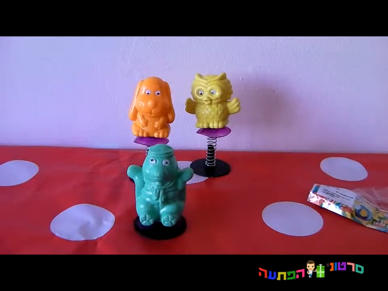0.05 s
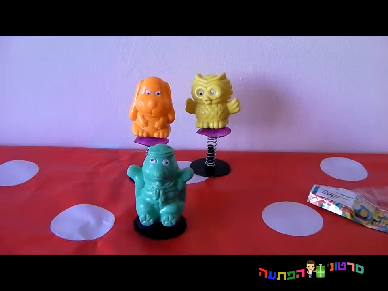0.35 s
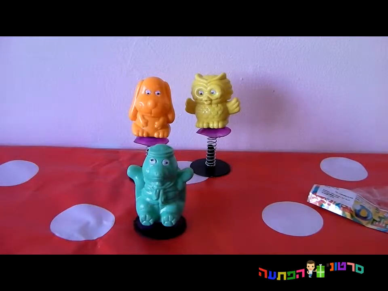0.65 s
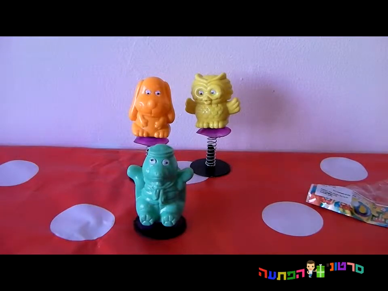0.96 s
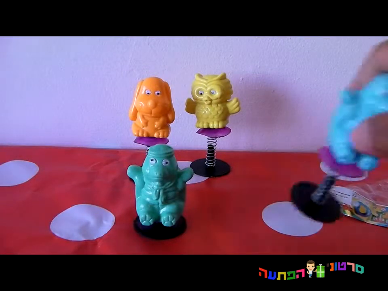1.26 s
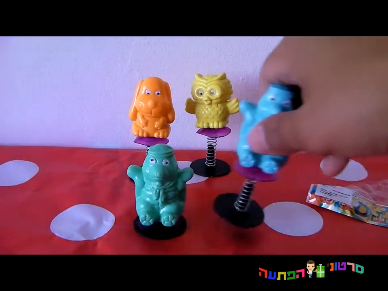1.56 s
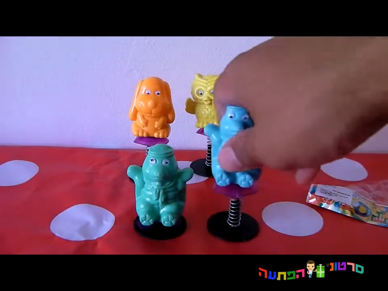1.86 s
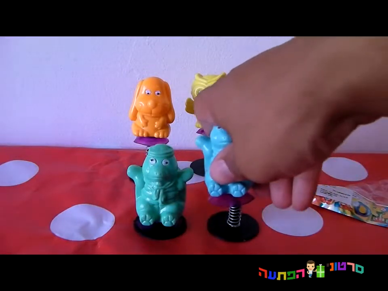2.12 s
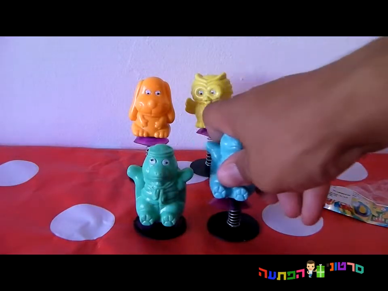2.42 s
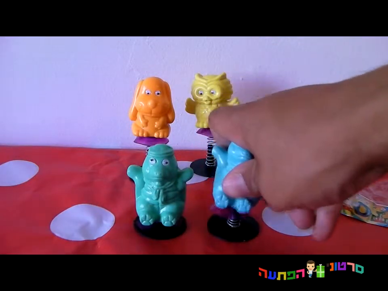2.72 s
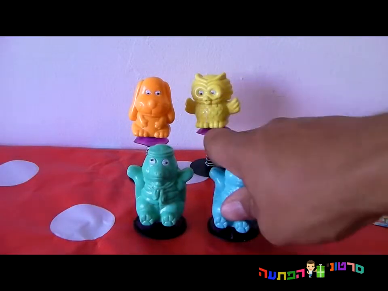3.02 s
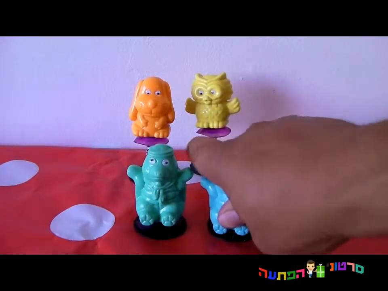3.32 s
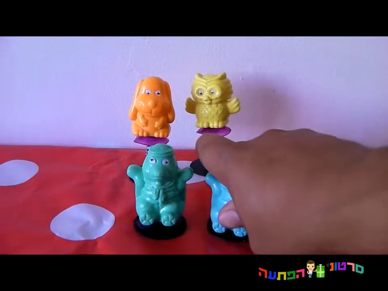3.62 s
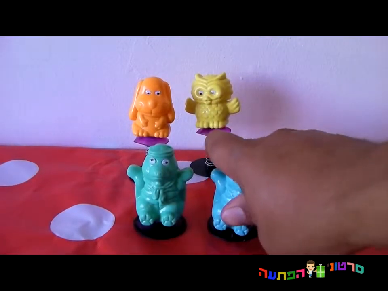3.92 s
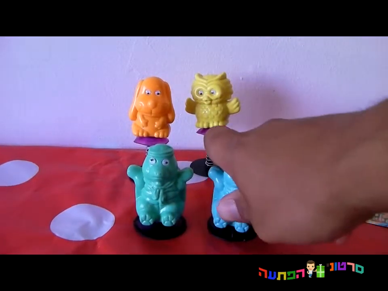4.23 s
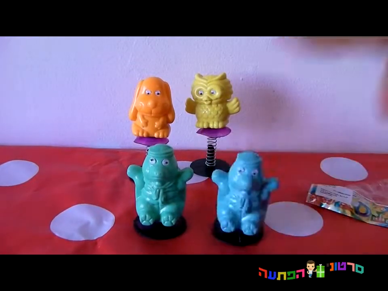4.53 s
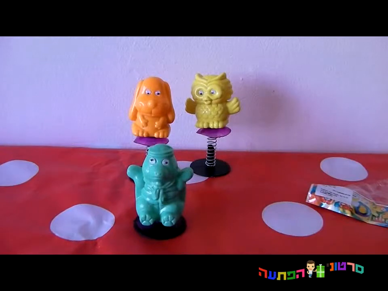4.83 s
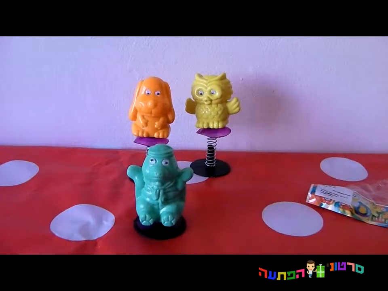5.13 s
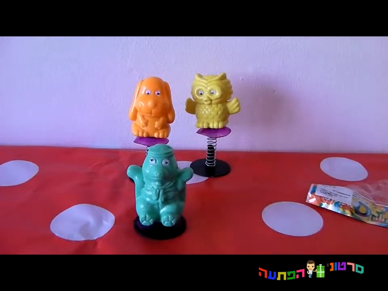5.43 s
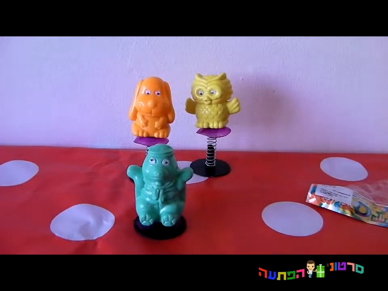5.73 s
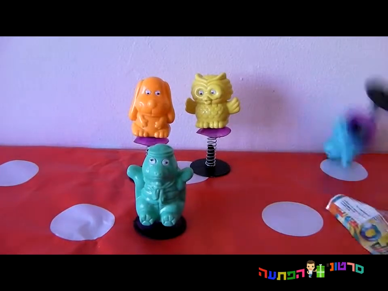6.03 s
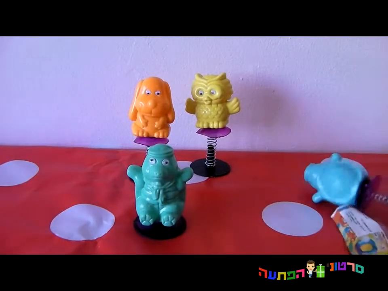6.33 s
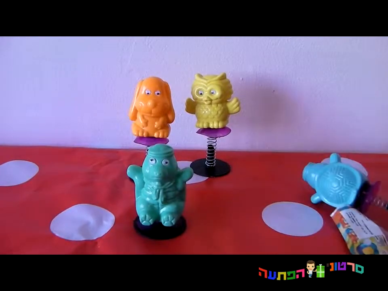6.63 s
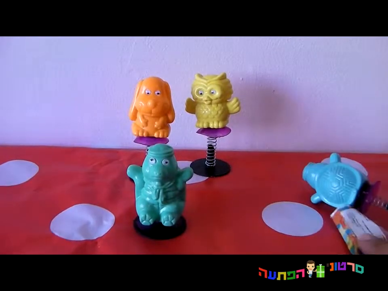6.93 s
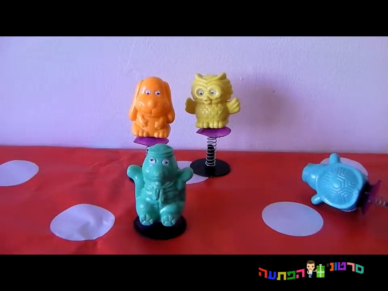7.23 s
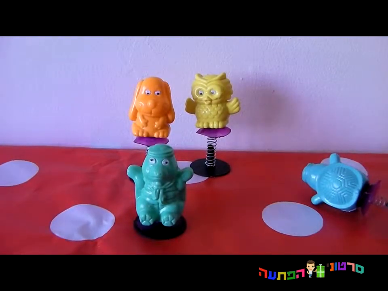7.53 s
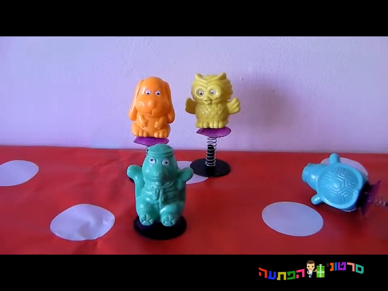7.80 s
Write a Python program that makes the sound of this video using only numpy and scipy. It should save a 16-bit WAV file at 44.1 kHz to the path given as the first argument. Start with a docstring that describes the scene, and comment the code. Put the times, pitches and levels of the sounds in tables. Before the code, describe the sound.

Hollow plastic jumping toys click, creak and snap loose, one landing with a loud clatter, before a wrapper slips away.

```python
"""Spring-loaded plastic toy animals with suction cups clack on a cloth-covered table.
One lands; a hand sets another down and presses it onto its cup; cups pop loose, and a toy leaps,
crashes and tumbles. Each blow rings a hollow plastic body and thumps the table. The toy nudges a
plastic packet, which slides off the edge. The place is a small, hard room with a faint hum.
Heard in stereo from close by, the toys a little to the right; the loudest blows overload the mics."""
import sys
import numpy as np
from scipy import signal
from scipy.fft import rfft, irfft, next_fast_len
from scipy.io import wavfile
from scipy.ndimage import map_coordinates

SR = 44100
rng = np.random.default_rng(int(sys.argv[2]) if len(sys.argv) > 2 else 0)


def store_pcm(level_fs):
    """Save levels as 16-bit WAV."""
    pcm = np.round(np.clip(level_fs, -1, 1) * 32767).astype(np.int16)
    wavfile.write(sys.argv[1], SR, np.atleast_2d(pcm).T)


N = 346626
TIME = np.arange(N) / SR
AGE = np.arange(SR * 3 // 4) / SR  # seconds since a contact
TOP_HZ = 15850

# A toy falls or tumbles. Each row: start in seconds, strength in dB, the clack's upper edge in Hz,
# hollow ring in dB, table thump in dB. Levels in all tables are relative.
LANDINGS = [(-.03, 6, 2700, 3.5, -15.5), (0.215, -4.5, 1664, -4, -20.5), (6.035, 9, 2700, -3.5, -13.5),
            (6.079, -19, 1500, -10, -19.5), (6.127, -17, 2840, -28, -28), (6.215, -22, 1773, -14.5, -23.5),
            (6.264, -8.5, 2883, -10.5, -22.5)]
# A toy is forced onto its cup. Each row: start in seconds, strength in dB, upper edge in Hz,
# snap in dB, push on the table in dB, wait until it settles in seconds, settling clack in dB.
PRESSES = [(2.3923, -17.5, 3130, -9, -36, 0.0365, -18.5), (2.88, -17, 4000, -17.5, -19.5, 0.028, -40),
           (3.0377, -9.5, 3270, -2, -14, 0.028, -18.5)]
# A cup lets go. Each row: start in seconds, strength in dB, upper edge in Hz, then snap,
# hollow ring, table thump and coil ring, all in dB.
RELEASES = [(4.799, -5.5, 3860, -6, -17, -18, -16), (5.703, -4, 3780, 8, -3, -22.5, -16.5)]
# Blows on the rim of a base. Each row: start in seconds, ring in dB.
RIM_BLOWS = [(2.393, -20), (3.038, -18), (6.036, 1), (6.264, -21)]
# The flying toy knocks on its spring. Each row: start in seconds, click in dB, hollow ring in dB.
RATTLES = [(5.733, -10, -26), (5.747, -9.5, -23), (5.795, -18, -29)]
# Jolts to the coils. Each row: start in seconds, level in dB.
JOLTS = [(3.039, -16.5), (4.809, -17.5), (5.709, -9), (6.042, -11.5), (6.265, -19)]
# Clicks of coils, cup rims, plastic and packet. Each row: start in seconds, level in dB, centre in Hz.
TICKS = [(0.293, -11.5, 7020), (1.9092, -26, 4930), (1.9234, -30, 4180), (2.8518, -23.5, 3500),
         (3.327, -28.5, 2500), (3.3547, -15.5, 6000), (3.9233, -20.5, 4420), (4.247, -29, 3500),
         (4.3878, -23, 1900), (4.56, -26, 6910), (4.593, -15.5, 5830), (6.078, -8.5, 10000),
         (6.163, -2, 7500), (7.501, -12.5, 10000)]
# The spring creaks, held down or in flight. Each row: start and end in seconds, mean level in dB,
# centre in Hz.
CREAKS = [(3.32, 3.9, -35, 8000), (4.3, 4.7, -32, 7000), (5.8, 6.0, -28, 11000)]
# Coils chatter or a cup's rim creeps. Each row: start and end in seconds, slips per second,
# level in dB, centre in Hz.
SLIP_RUNS = [(0.886, 1.005, 44, -31, 4050), (2.902, 2.969, 103, -33, 11000),
             (3.334, 3.427, 62, -40.5, 6650), (4.588, 4.677, 40, -35, 8500),
             (4.805, 4.836, 240, -7.5, 11900)]
# Finger strokes. Each row: start and length in seconds, rubbing in dB, table rumble in dB.
FINGER_STROKES = [(0.805, 0.19, -42, -47), (1.103, 0.54, -47, -66), (1.939, 0.2, -49, -81),
                  (2.385, 0.42, -45, -53), (3.218, 0.25, -42, -44), (3.92, 0.1, -41, -52),
                  (4.214, 0.14, -46, -49.5), (4.41, 0.26, -47.5, -53), (5.083, 0.02, -40.5, -41.5)]
# Soft bumps on the table. Each row: start in seconds, level in dB.
BUMPS = [(0.754, -43), (3.72, -40.5), (3.861, -40), (4.326, -41), (4.569, -27), (6.516, -37), (6.719, -48),
         (6.946, -39.5)]
# The packet slides in fits and starts. Each row: start and length in seconds, level in dB.
SLIDES = [(6.03, 0.57, -45.5), (6.683, 0.1, -38.5), (6.825, 0.048, -41.5), (7.019, 0.43, -39),
          (7.185, 0.089, -30), (7.31, 0.21, -38.5), (7.613, 0.52, -40)]
# Snaps of the packet's film. Each row: start in seconds, level in dB.
CRINKLES = [(7.03, -31), (7.122, -26.5), (7.132, -16.5), (7.139, -19.5), (7.175, -22), (7.201, -20.5),
            (7.228, -17.5), (7.248, -17), (7.257, -22), (7.297, -20.5)]

# Modes of a toy's shell (free and held), hollow body, base and coils, and of the table.
# Each row: frequency in Hz, level in dB, time to fall 60 dB in seconds.
SHELL_MODES = [(988, -13, 0.14), (1121, -11, 0.22), (1330, -14, 0.18), (1538, -10, 0.15), (1859, -14, 0.16),
               (2115, -14, 0.13), (2352, -12, 0.14), (3150, 6, 0.012)]
HELD_SHELL_MODES = [(780, 0, 0.018), (1560, -8, 0.025), (2560, 3, 0.018), (3800, 2, 0.012)]
HOLLOW_MODES = [(416, -13, 0.24), (428, 5, 0.05), (448, -13, 0.2), (476, 1, 0.06), (591, -5, 0.07)]
BASE_MODES = [(735, 0, 0.12), (1150, -3, 0.03)]
COIL_MODES = [(2700, 9, 0.012), (3370, -10, 0.2), (3500, 5, 0.014), (4437, -15, 0.22)]
TABLE_MODES = [(52, -12.5, 0.78), (78.9, -14.5, 0.53), (109.6, 2, 0.14), (125.2, 2.5, 0.28),
               (194.6, -2, 0.32), (245.7, -10, 0.21)]

# Noise spectra of spring, cup, fingers, packet, table and room.
# Each row: frequency in Hz, spectral density in dB.
SPRING_RUB = [(3000, -27), (3900, -15), (4900, -12), (5400, -27), (7000, -32), (9200, -27), (15000, -33)]
CUP_LEAK = [(1180, -11), (2000, -10.5), (2790, -5), (4510, 0), (6040, 5.5), (7110, 3), (7810, -2),
            (15500, -3.5)]
FINGER_RUB = [(350, -3.5), (600, -3.5), (843, -11.5), (2500, -11.5), (3000, -7.5), (3500, -9.5),
              (6300, -10.5), (7850, -12), (15500, -16.5)]
PACKET_HISS = [(180, -35.5), (300, -27.5), (384, -3.5), (1070, -22.5), (2830, -5.5), (5850, -2), (7880, -5),
               (9760, -2.5), (15500, -5)]
EDGE_SCRAPE = [(250, -15), (420, -4.5), (900, -4.5), (1200, -9), (1500, 4), (1950, -8.5), (2800, 0),
               (6500, -5), (15500, -7)]
TABLE_RUMBLE = [(20, -18), (48, -3), (70, -8.5), (150, -3.5), (700, -87)]
ROOM_NOISE = [(25, -6), (55, 0), (150, -1), (260, -7), (420, 0), (900, -11), (2000, -13), (4500, -14),
              (15500, -18)]

# The room's hum. Each row: frequency in Hz, level in dB.
HUM_TONES = [(177.6, -60), (366.1, -65.5), (802.1, -72)]
# The room's decay. Each row: frequency in Hz, time to fall 60 dB in seconds.
ROOM_DECAY = [(100, 1), (260, 0.6), (700, 0.54), (1840, 0.54), (4850, 0.47), (12800, 0.49)]
# Reflections off the walls. Each row: frequency in Hz, gain in dB.
WALL_GAIN = [(100, -4), (400, 0.5), (1500, 11.5), (4000, 6.5), (12000, -1)]
# Width of diffuse sound at the mics. Each row: frequency in Hz, side minus mid in dB.
STEREO_WIDTH = [(300, -10), (1000, -4.5), (2000, -4.5), (4000, -0.5)]


def landings(usual_edge_hz=2380, snap_db_per_octave=9, rebound_s=0.028, rebound_db=-16):
    """A falling toy strikes, then its other end does, more softly; harder contacts snap more."""
    out = np.zeros((2, N))
    for s, db, edge_hz, hollow_db, table_db in LANDINGS:
        snap_db = db - 4 + snap_db_per_octave * np.log2(edge_hz / usual_edge_hz)
        add(out, s, contact(db, edge_hz, snap_db, hollow_db, table_db))
        rebound = contact(db, edge_hz * 0.87, snap_db - 12, hollow_db, table_db)
        add(out, s + rebound_s, amp(rebound_db) * rebound)
    return out


def presses(settle_edge_hz=2400):
    """A held toy clacks down, then settles more softly; the fingers cut its ring short."""
    held = dict(modes=HELD_SHELL_MODES, shell_db=-6, low_share=0.26, snap_edge_hz=13000, snap_t60=0.0085)
    out = np.zeros((2, N))
    for s, db, edge_hz, snap_db, push_db, wait_s, settle_db in PRESSES:
        add(out, s, contact(db, edge_hz, snap_db, push_db - 1, push_db, **held))
        settle = contact(settle_db, settle_edge_hz, settle_db - 5, push_db - 4, push_db - 3, **held)
        add(out, s + wait_s, settle)
    return out


def releases(spring_open_s=0.0094, stop_edge_hz=4500, room_db=-8):
    """A cup pops off the table; the spring then hits its stop with a brighter clack, and rings."""
    toy = dict(shell_db=-14, room_db=room_db)
    out = np.zeros((2, N))
    for s, db, edge_hz, snap_db, hollow_db, table_db, coils_db in RELEASES:
        pop = contact(db, edge_hz, snap_db, hollow_db, table_db, low_share=0.16, **toy)
        stop = contact(db - 6, stop_edge_hz, db + 3, hollow_db - 8, table_db - 6, **toy)
        coils = amp(coils_db) * in_room(ring(COIL_MODES), room_db)
        add(out, s, pop)
        add(out, s + spring_open_s, stop + coils)
    return out


def contact(clack_db, edge_hz, snap_db, hollow_db, table_db, modes=SHELL_MODES, shell_db=-12,
            room_db=-7, low_share=0.3, snap_edge_hz=12500, snap_t60=0.0069):
    """One blow cracks, rings the toy's shell and hollow body, and thumps the table."""
    # soft contacts spare the high modes
    shell = [(hz, db - 10 * np.log10(1 + (hz / edge_hz) ** 4), t60) for hz, db, t60 in modes]
    body = amp(clack_db + shell_db) * ring(shell) + amp(table_db) * thump()
    body += amp(hollow_db) * ring(HOLLOW_MODES) * onset(0.0038)
    clack = amp(clack_db) * crack(edge_hz * low_share, edge_hz, t60=0.029, room_db=room_db)
    snap = amp(snap_db) * crack(2800, snap_edge_hz, snap_t60, room_db, order=2)
    return in_room(body, room_db) + amp(6) * (clack + snap)


def base_rings():
    """A toy's round base rings from a blow on its rim."""
    out = np.zeros((2, N))
    for s, db in RIM_BLOWS:
        add(out, s, amp(db) * in_room(ring(BASE_MODES), room_db=-7))
    return out


def rattles():
    """The leaping toy shakes on its spring: each knock clicks and rings the hollow body anew."""
    out = np.zeros((2, N))
    for s, click_db, hollow_db in RATTLES:
        add(out, s, amp(click_db) * crack(low_hz=2800, edge_hz=10500, t60=0.024, room_db=-6))
        add(out, s, amp(hollow_db) * in_room(ring(HOLLOW_MODES), room_db=-6))
    return out


def jangle(length_s=0.17, sag_db_per_s=85, centre_hz=10300, scatter_db=5, taps=16):
    """After a jolt the coils tap each other, ever more rarely and faintly."""
    out = np.zeros((2, N))
    for s, db in JOLTS:
        for when, force in rng.random((taps, 2)):
            age = length_s * when ** 2
            tap_db = db - sag_db_per_s * age + scatter_db * (2 * force - 1)
            tap = crack(centre_hz * .85, centre_hz * 1.15, t60=.009, room_db=-11)
            add(out, s + age, amp(tap_db) * tap)
    return out


def ticks_and_creaks(scatter_db=4, clicks_per_creak=10):
    """Light contacts click without ringing; the strained spring creaks in random clicks."""
    clicks = list(TICKS)
    for start, end, db, hz in CREAKS:
        for when, force, pitch in rng.random((clicks_per_creak, 3)):
            s = start + (end - start) * when
            clicks.append((s, db + scatter_db * (2 * force - 1), hz * 2 ** (pitch - .5)))
    out = np.zeros((2, N))
    for s, db, hz in clicks:
        add(out, s, amp(db - 4) * crack(hz * .6, hz * 1.8, t60=0.014, room_db=-5, order=2))
    return out


def slips():
    """Coils and cup rims catch and slip in quick, even runs."""
    out = np.zeros((2, N))
    for start, end, rate, db, hz in SLIP_RUNS:
        for s in np.arange(start, end, 1 / rate):
            gain = amp(db + 6 + 1.5 * rng.normal())
            add(out, s, gain * crack(hz * .6, hz * 1.7, t60=.011, room_db=-8))
    return out


def spring_squeak(start_s=2.585, top_hz=4815, rise_hz=300, rise_s=0.008):
    """The spring rubs under the hand and gives one thin, rising squeak."""
    rub = friction(SPRING_RUB, grain_db=2, grain_rate=120)
    squeeze = stroke(start=2.45, length=0.22, attack_s=0.1, release_s=0.4, sag_db_per_s=4)
    age = np.maximum(TIME - start_s, 0)
    pitch_hz = top_hz - rise_hz * np.exp(-age / rise_s) + 32 * wobble(400)
    phase = 2 * np.pi * np.cumsum(pitch_hz) / SR
    rasp = (np.sin(phase) + amp(-18) * np.sin(2 * phase)) * amp(5.3 * wobble(460))
    squeak = rasp * stroke(start_s, length=0.05, attack_s=0.009, release_s=0.35, sag_db_per_s=-13)
    return amp(-47) * squeeze * rub + amp(-45) * squeak


def cup_leak(start_s=5.2):
    """Air hisses under the last cup, swelling until it lets go."""
    pop_s = RELEASES[-1][0]
    swell = stroke(start_s, pop_s - start_s, attack_s=0.069, release_s=0.06, sag_db_per_s=-6.5)
    return amp(-38.5) * swell * diffuse(CUP_LEAK, N)


def hand(attack_s=0.029, release_s=0.27):
    """Fingers grip lightly and stroke over plastic and cloth; the table rumbles with each stroke."""
    rub = amp(-55) * stroke(0.45, 4.8, attack_s, release_s, sag_db_per_s=0)  # the long, light grip
    rumble = np.zeros(N)
    for start, length, rub_db, rumble_db in FINGER_STROKES:
        move = stroke(start, length, attack_s, release_s, sag_db_per_s=6)
        rub = np.maximum(rub, amp(rub_db) * move)
        rumble += amp(rumble_db) * move
    unsteady = amp(-1.04 * wobble(31))
    rubbing = unsteady * rub * friction(FINGER_RUB, grain_db=1.56, grain_rate=160)
    return rubbing + rumble * diffuse(TABLE_RUMBLE, N)


def bumps():
    """Soft pushes only thump the table."""
    out = np.zeros((2, N))
    for s, db in BUMPS:
        add(out, s, amp(db) * thump()[None])
    return out


def thump():
    """The table's dull answer to a push."""
    return ring(TABLE_MODES) * onset(0.0062)


def packet():
    """Right of centre, the plastic packet slides across the cloth and scrapes over the edge."""
    moves = [amp(db) * stroke(start, length, attack_s=0.016, release_s=0.43, sag_db_per_s=-3.5)
             for start, length, db in SLIDES]
    speed = np.linalg.norm(moves, axis=0)
    over_edge = stroke(start=7.11, length=0.4, attack_s=0.012, release_s=0.2, sag_db_per_s=16)
    hiss = speed * friction(PACKET_HISS, grain_db=0.66, grain_rate=170)
    scrape = amp(-36) * over_edge * friction(EDGE_SCRAPE, grain_db=4.0, grain_rate=480)
    rumble = amp(-22) * speed * diffuse(TABLE_RUMBLE, N)
    return amp([[.5], [4]]) * (hiss + scrape) + rumble


def crinkles():
    """The packet's film buckles in dry snaps as it bends over the edge."""
    out = np.zeros((2, N))
    for s, db in CRINKLES:
        add(out, s, amp(db) * crack(low_hz=2400, edge_hz=6500, t60=0.0096, room_db=-6))
    return out


def room_tone():
    """Behind the table: soft room noise and a slightly unsteady hum."""
    hum = np.zeros(N)
    for hz, db in HUM_TONES:
        peak = np.sqrt(2) * amp(db + 1.2 * wobble(9.0))
        hum += peak * np.sin(2 * np.pi * hz * TIME + 0.38 * wobble(1.4))
    return amp(-53) * diffuse(ROOM_NOISE, N) + hum


def walls():
    """The hard room's dense stereo answer to a click, drawn anew each time."""
    hz, t, spectra = signal.stft(diffuse([(1, 0), (TOP_HZ, 0)], len(AGE)), SR, nperseg=256)
    decay = amp(-60 * t / along(ROOM_DECAY, hz)[:, None])
    tail = signal.istft(spectra * decay, SR, nperseg=256)[1][:, :len(AGE)]
    return filtered(tail / np.linalg.norm(tail[0]), lambda f: amp(along(WALL_GAIN, f))) * onset(0.0015)


def in_room(x, room_db):
    """A sound reaches the mics directly and off the walls."""
    return from_right(x) + amp(room_db) * signal.fftconvolve(x[None], walls(), axes=1)[:, :len(x)]


def from_right(x):
    """The treble reaches the left mic later and weaker."""
    right = lambda f: (amp(2.4) * np.exp(.9j)) ** (f ** 2 / (f ** 2 + 2800 ** 2))
    return filtered(x, lambda f: np.array([1 / right(f), right(f)]))


def bounced(x, count=2, echo_db=-11):
    """The tabletop and nearby toys throw back quick echoes that colour each crack differently."""
    delays_s = rng.uniform(.0002, .0011, count)
    comb = lambda f: 1 + amp(echo_db) * np.exp(-2j * np.pi * np.outer(delays_s, f)).sum(0)
    return filtered(x, comb) / np.sqrt(1 + count * amp(echo_db) ** 2)


def crack(low_hz, edge_hz, t60, room_db, order=3, size=4096):
    """A contact's burst, even from low_hz to edge_hz; the room scatters it into a smooth wash."""
    band = np.vstack([signal.butter(2, low_hz, 'high', fs=SR, output='sos'),
                      signal.butter(order, min(edge_hz, TOP_HZ), fs=SR, output='sos')])
    envelope = amp(-60 * AGE / t60) * onset(0.00036)
    phases = np.angle(rfft(envelope[:size] * rng.standard_normal(size), 2 * size))
    flat_burst = irfft(np.exp(1j * phases))[:size]
    burst = signal.sosfilt(band, np.pad(flat_burst, (0, len(AGE) - size)))
    direct = from_right(bounced(burst / np.linalg.norm(burst)))
    wash = amp(room_db) * signal.sosfilt(band, walls())
    return np.linalg.norm(envelope) * (direct + wash)


def ring(modes):
    """Damped modes, struck at slightly new strengths and pitches each time."""
    struck = [(hz * (1 + .004 * rng.normal()), db + 2.2 * rng.normal(), t60) for hz, db, t60 in modes]
    return sum(amp(db - 60 * AGE / t60) * np.sin(2 * np.pi * hz * AGE) for hz, db, t60 in struck)


def friction(spectrum, grain_db, grain_rate):
    """Rubbing noise that catches and slips in tiny grains."""
    return unit(diffuse(spectrum, N) * amp(grain_db * wobble(grain_rate)))


def diffuse(spectrum, n):
    """Coloured noise of rms 1: alike at both mics in the bass, unrelated in the treble."""
    gains = lambda hz: amp([along(spectrum, hz), along(spectrum, hz) + along(STEREO_WIDTH, hz)])
    mid, side = filtered(rng.standard_normal((2, n)), gains)
    return unit(np.array([mid + side, mid - side]))


def stroke(start, length, attack_s, release_s, sag_db_per_s):
    """Envelope of one movement: it rises, sags (or swells, if the sag is negative), then dies away."""
    t = TIME - start
    fall_db = sag_db_per_s * np.clip(t, 0, length) + 60 * np.maximum(t - length, 0) / release_s
    return np.clip(t / attack_s, 0, 1) * amp(-fall_db)


def onset(rise_s):
    """A smooth rise from 0 to 1 after a contact."""
    return 1 - np.exp(-AGE / rise_s)


def wobble(rate):
    """A smooth random curve, rate knots a second."""
    return map_coordinates(rng.standard_normal(int(N * rate / SR) + 4), [TIME * rate])


def filtered(x, response):
    """Filter x by a gain given as a function of Hz."""
    n = x.shape[-1]
    padded = next_fast_len(n + 4096)
    return irfft(rfft(x, padded) * response(np.fft.rfftfreq(padded, 1 / SR)), padded)[..., :n]


def along(points, hz):
    """Read (Hz, value) points on a log axis."""
    knots_hz, values = np.transpose(points)
    return np.interp(np.log(hz + 1), np.log(knots_hz + 1), values)


def amp(db):
    """Decibels to gain."""
    return 10 ** (np.asarray(db) / 20)


def unit(x):
    """Scale to rms 1."""
    return x / np.sqrt(np.mean(x ** 2) + 1e-20)


def add(track, s, sound):
    """Mix a sound in at s seconds."""
    start = round(s * SR)
    part = sound[:, max(-start, 0):N - start]
    track[:, max(start, 0):][:, :part.shape[1]] += part


def scene():
    """Everything on and around the table, as it arrives at the mics."""
    blows = landings() + presses() + base_rings() + releases() + rattles()
    small_sounds = ticks_and_creaks() + slips() + jangle() + spring_squeak() + cup_leak()
    return blows + small_sounds + hand() + bumps() + packet() + crinkles() + room_tone()


def record(dry, low_cut_hz=36, notch_hz=7850, notch_width_hz=260, bass_tilt_db=1.44, ceiling=.96):
    """The mics lose both ends of the band, notch the treble, lean left in the bass and overload."""
    notch = lambda f: (notch_hz ** 2 - f ** 2) / (notch_hz ** 2 - f ** 2 + 2j * f * notch_width_hz)
    bass_left = lambda f: amp(np.outer([1, -1], bass_tilt_db / (1 + (f / 800) ** 2)))
    x = signal.sosfilt(signal.butter(3, low_cut_hz, 'high', fs=SR, output='sos'), dry)
    x = filtered(x, lambda f: notch(f) * bass_left(f))
    x = x / (1 + np.abs(x / ceiling) ** 10) ** (1 / 10)  # loud blows saturate
    return filtered(x, lambda f: np.clip((TOP_HZ - f) / 300 + .5, 0, 1))


dry = scene()
out = record(dry)
store_pcm(out)
```